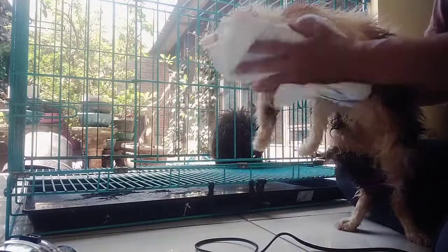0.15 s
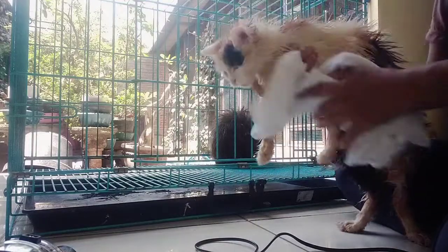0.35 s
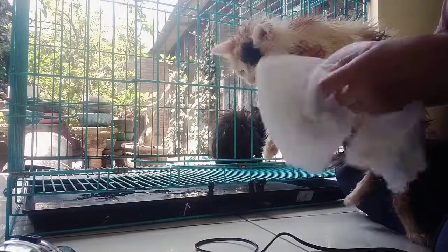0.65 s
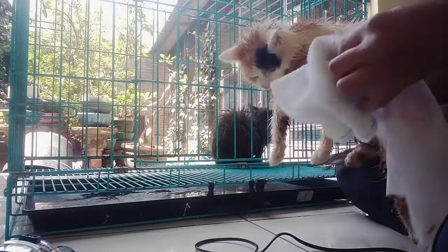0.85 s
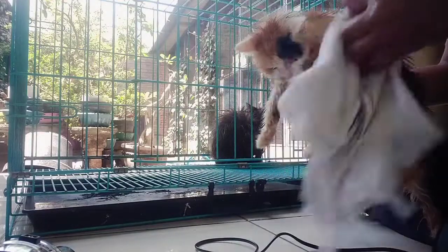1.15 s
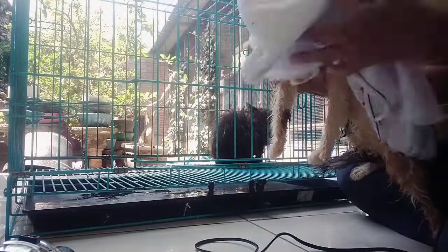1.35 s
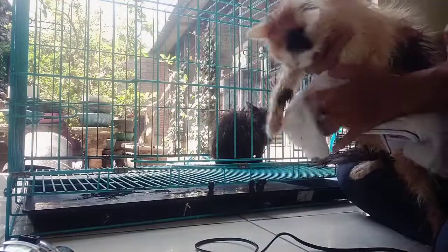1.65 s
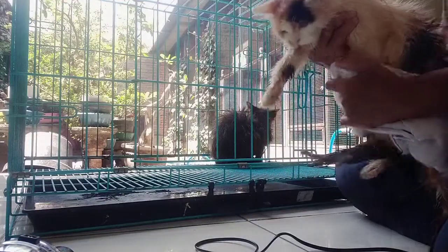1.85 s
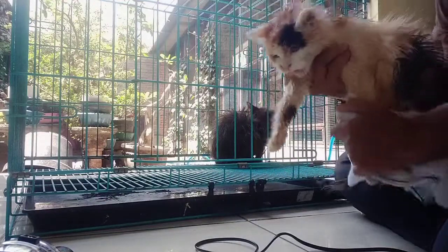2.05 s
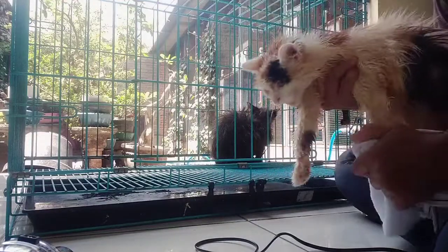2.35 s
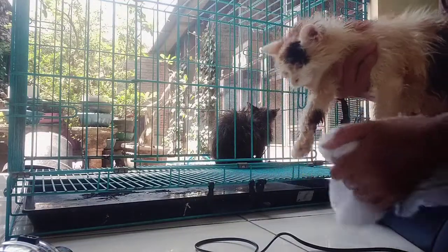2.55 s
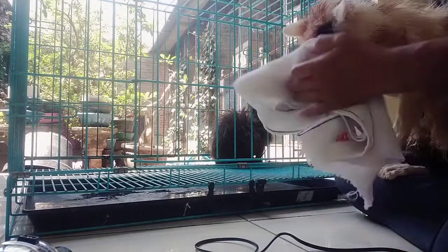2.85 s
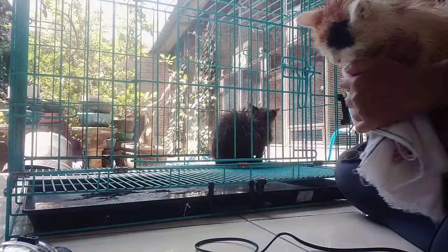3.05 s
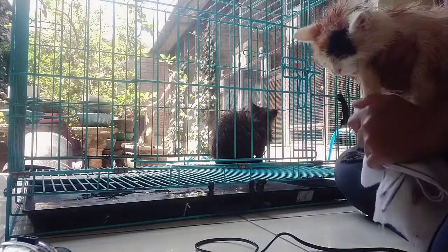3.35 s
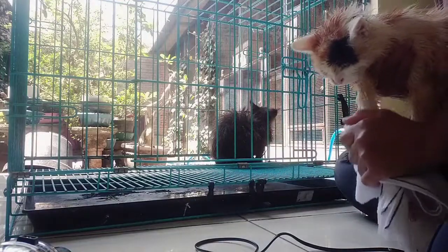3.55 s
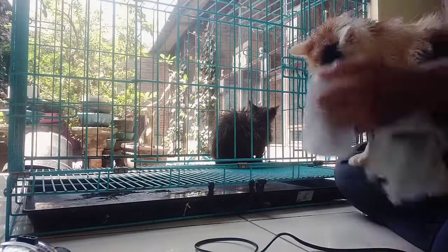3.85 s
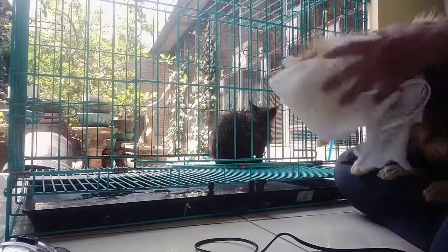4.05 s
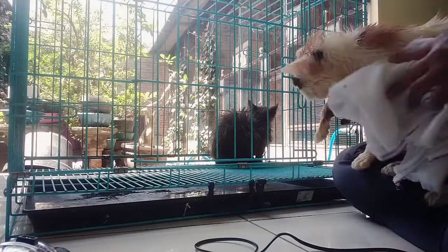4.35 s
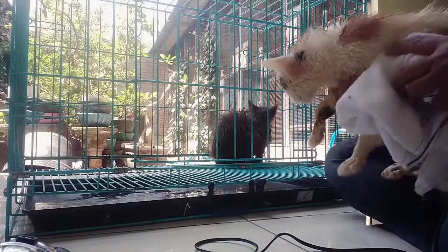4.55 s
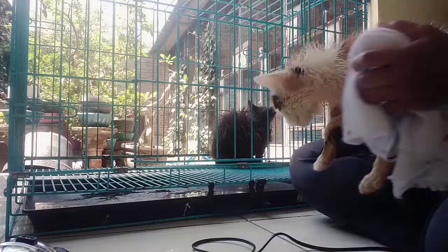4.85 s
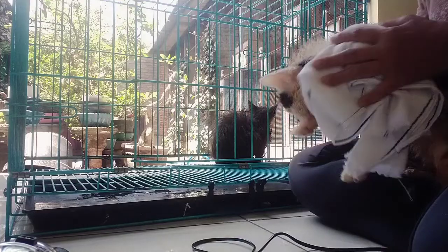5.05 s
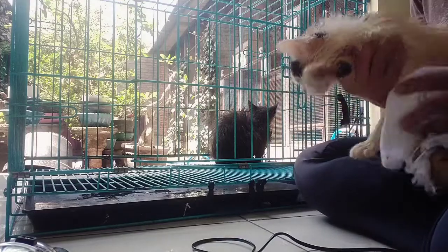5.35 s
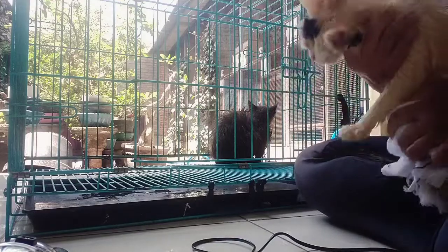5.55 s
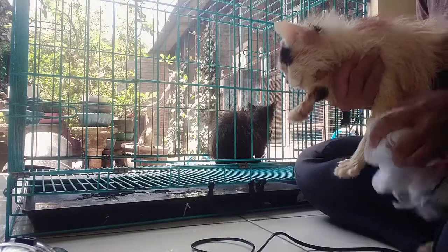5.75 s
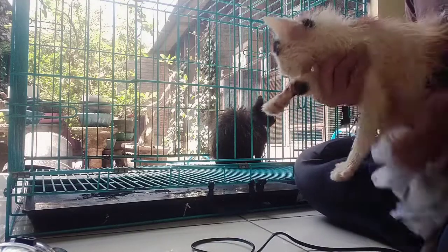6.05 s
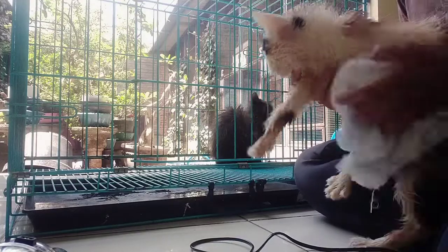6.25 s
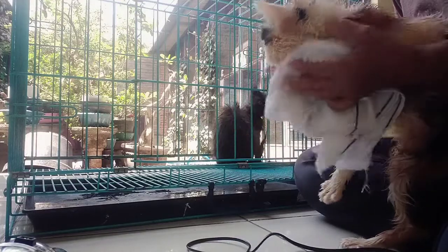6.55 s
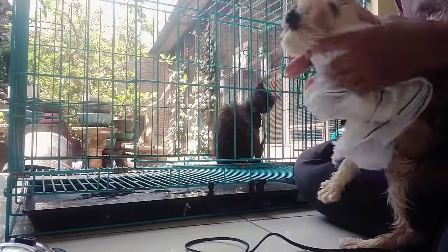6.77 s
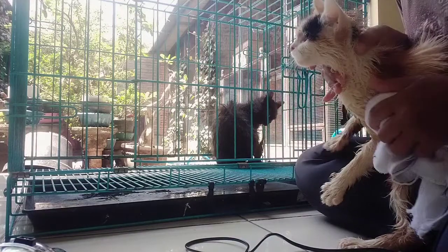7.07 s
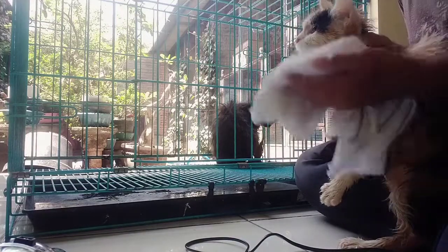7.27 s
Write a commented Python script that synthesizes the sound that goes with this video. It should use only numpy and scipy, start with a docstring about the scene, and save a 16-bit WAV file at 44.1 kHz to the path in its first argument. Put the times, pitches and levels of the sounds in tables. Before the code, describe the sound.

A hair dryer blows steadily close by on a tiled porch while several garden birds whistle, chip and swoop over the airy roar.

```python
"""A hair dryer blows steadily on a tiled porch, close to a small microphone: shaped noise that flickers.
Four garden birds call over it, built from gliding tones with overtones: one whistles, one swoops,
one repeats a two-note chip and one peeps thinly. The yard walls add echoes and a short tail to them.
Faint motor and mains tones and a low rumble lie underneath."""
import sys
import numpy as np
from scipy import signal
from scipy.fft import rfft, irfft, next_fast_len
from scipy.io import wavfile

SR = 44100
rng = np.random.default_rng(int(sys.argv[2]) if len(sys.argv) > 2 else 0)


def store_wav(level_fs):
    """Save 16-bit WAV to argv[1]."""
    pcm = np.round(np.clip(np.atleast_2d(level_fs), -1, 1) * 32767)
    wavfile.write(sys.argv[1], SR, pcm.T.astype(np.int16))


N = 326781   # length in samples


def amp(db):
    """Turns a level in dB into a gain."""
    return 10 ** (np.asarray(db) / 20)


def rms_one(x):
    """Scales a sound to an rms of 1."""
    return x / np.sqrt(np.mean(x ** 2) + 1e-20)


def drift(rate_hz):
    """Random wandering of rms 1: noise through two equal one-pole low-passes, made every 40 samples."""
    pole = np.exp(-2 * np.pi * rate_hz * 40 / SR)
    noise = rng.standard_normal(N // 40 + 2002)
    slow = signal.lfilter([1], [1, -2 * pole, pole ** 2], noise)[2000:]   # skip the filter's start
    return np.interp(np.arange(N) / 40, np.arange(len(slow)), rms_one(slow))


# Broad colour of the air jet; only the balance counts: pitch_hz, level_db (per Hz)
JET = [(28, -28), (120, -50), (315, -66), (480, -16.5), (1350, -15), (2200, -25.5), (2900, -19),
       (3300, -17.5), (4100, -22), (6450, -26), (9300, -29.5), (11300, -30), (14000, -27.5), (15800, -19.5)]
# Resonances of barrel, nozzle and grille, on the same scale: centre_hz, width_hz, level_db (per Hz)
BARREL = [(683, 178, -2.5), (980, 452, -2), (1436, 27, -5.5), (1769, 322, 2), (2426, 620, -12.5),
          (2670, 245, -12.5), (4750, 880, -21.5), (7480, 750, -25.5), (8240, 960, -17), (10400, 690, -26.5),
          (12000, 470, -26.5), (15900, 450, -30)]
FLOW_DB = -25.5   # rms level of the whole air flow


def dryer(shared_db=0.6, own_db=0.88):
    """Turbulent air: noise coloured by jet and barrel; octave bands flicker together and on their own."""
    size = next_fast_len(N)
    hz = np.arange(size // 2 + 1) * SR / size + 1   # the 1 avoids log(0)
    jet_hz, jet_db = np.transpose(JET)
    power = amp(np.interp(np.log(hz), np.log(jet_hz), jet_db)) ** 2
    for centre_hz, width_hz, level_db in BARREL:
        offset = (hz - centre_hz) / (.5 * width_hz)
        power = power + amp(level_db) ** 2 / (1 + offset ** 2) ** 2
    spectrum = rfft(rng.standard_normal(size)) * np.sqrt(power)
    octave = np.clip(np.log2(hz / 250), 0, 6)
    shared_flicker = drift(4.0)
    air = 0
    for k in range(7):
        share = np.clip(1 - np.abs(octave - k), 0, 1)   # neighbouring bands overlap
        band = irfft(spectrum * share, size)[:N]
        air = air + band * amp(shared_db * shared_flicker + own_db * drift(10.6))
    return amp(FLOW_DB) * rms_one(air)


def sing(notes, overtones, waver, throb_db, tremble_hz=68.0):
    """Gliding tones with soft ends; pitch trembles by the share waver, level by throb_db (both rms)."""
    out = np.zeros(N)
    tremble = drift(tremble_hz)
    throb = amp(throb_db * drift(23.4))
    for note, share in zip(notes, np.broadcast_to(waver, len(notes))):
        time_s, pitch_hz, level_db = np.transpose(note)
        at = np.arange(int(time_s[0] * SR), int(time_s[-1] * SR))
        pitch = np.interp(at / SR, time_s, pitch_hz) * (1 + share * tremble[at])
        phase = 2 * np.pi * np.cumsum(pitch) / SR
        tone = sum(amp(db) * np.sin(k * phase) for k, db in overtones)
        level = np.sqrt(2) * amp(np.interp(at / SR, time_s, level_db))
        out[at] += level * signal.windows.tukey(len(at), .15) * tone
    return out * throb


# All bird levels below are base levels, before overtones, throb, yard and mix.
# Short pips of the whistler: peak_s, pitch_hz, level_db, glide_hz_per_s
PIPS = [(.35, 3020, -23.5, 400), (.52, 2170, -21.5, -300), (.655, 2420, -21, -2500),
        (.96, 2784, -15, -1500), (.99, 2360, -19, 900), (1.15, 2293, -17.5, -400), (1.508, 1823, -12, 1500),
        (1.63, 2122, -10, -4500), (1.735, 1480, -17, -2600), (1.765, 2568, -11, -400),
        (1.826, 2530, -15, -2000), (2.34, 2800, -28, 600), (6.299, 3240, -29, -2500),
        (6.345, 3100, -24.5, -2500), (6.4, 2830, -27, -1500)]
PIP_ATTACK_S, PIP_RELEASE_S = .022, .017
PIP_START_DB, PIP_END_DB = -26, -26   # relative to the peak


def pips():
    """A quick rise and fall in level on a straight glide."""
    notes = []
    for peak_s, hz, db, glide in PIPS:
        notes.append([(peak_s - PIP_ATTACK_S, hz - glide * PIP_ATTACK_S, db + PIP_START_DB),
                      (peak_s, hz, db),
                      (peak_s + PIP_RELEASE_S, hz + glide * PIP_RELEASE_S, db + PIP_END_DB)])
    return notes


# Lead notes of the whistler's two-note phrase: start_s, length_s, held_pitch_hz, level_db, sag_hz
LEADS = [(2.993, 0.12, 2037, -10, 45), (4.002, 0.14, 2041, -12, 8.8), (5.336, .13, 2036, -11.5, 135)]
SCOOP_S, SETTLE_S = .031, .065   # times after the start
SCOOP_HZ, OVERSHOOT_HZ = 354, 73.4   # how far below it starts, how far above it swings
SCOOP_DB, TURN_DB, LEAD_END_DB = -4.5, -4.5, -17   # relative to the held level


def leads():
    """Scoops up past the pitch, settles on it, holds while sagging, then fades."""
    notes = []
    for s, length, hz, db, sag_hz in LEADS:
        notes.append([(s, hz - SCOOP_HZ, db + SCOOP_DB),
                      (s + SCOOP_S, hz + OVERSHOOT_HZ, db + TURN_DB),
                      (s + SETTLE_S, hz, db),
                      (s + 0.84 * length, hz - sag_hz, db),
                      (s + length, hz - sag_hz, db + LEAD_END_DB)])
    return notes


# Burred notes of the whistler:
# start_s, length_s, start_hz, turn_hz, crest_hz, end_hz, level_db, burr (share of pitch)
ANSWERS = [(1.921, 0.18, 2010, 2127, 2257, 2207, -17, 0.034),
           (2.151, 0.24, 1895, 1968, 2067, 2300, -16, 0.05),
           (3.178, 0.23, 2004, 1808, 1902, 2380, -13, .016),
           (4.194, .23, 2032, 1828, 2070, 2450, -14, 0.0505),
           (5.548, .2, 2008, 1696, 1962, 2384, -16, 0.04)]
TURN_SHARE, CREST_SHARE = .22, .65   # shares of the note's length
ANSWER_START_DB, ANSWER_END_DB = -1.5, -21.5   # relative to the middle


def answers():
    """Slides to a turning pitch, climbs to a crest, then fades while moving to its end pitch."""
    notes = []
    for s, length, start_hz, turn_hz, crest_hz, end_hz, db, burr in ANSWERS:
        notes.append([(s, start_hz, db + ANSWER_START_DB),
                      (s + TURN_SHARE * length, turn_hz, db),
                      (s + CREST_SHARE * length, crest_hz, db),
                      (s + length, end_hz, db + ANSWER_END_DB)])
    return notes


# Overtones of the whistler: multiple of the pitch, level_db
WHISTLE_OVERTONES = [(1, 0.5), (4, -31), (5, -32), (6, -38)]


def whistler():
    """Nearly pure whistles; the burred answers tremble faster than the pips and leads."""
    clear = sing(pips() + leads(), WHISTLE_OVERTONES, waver=.016, throb_db=2.5)
    burr = np.array(ANSWERS)[:, -1]
    return clear + sing(answers(), WHISTLE_OVERTONES, waver=burr, throb_db=3.0, tremble_hz=130)


# Swooping bird:
# start_s, length_s, start_hz, goal_hz, glide_s, peak_s (after the start), level_db, rasp (share of pitch)
SWOOPS = [(.815, .035, 7000, 6870, .01, 0.011, -29, 0.032),
          (1.011, .04, 5500, 5200, .015, .015, -28, 0.027),
          (3.981, 0.013, 3620, 6530, 0.011, 0.012, -15, 0.067),
          (3.995, 0.051, 6180, 5710, 0.0066, 0.014, -16, .045),
          (3.998, 0.035, 5200, 5050, 0.011, .01, -20, 0.037),
          (4.014, .055, 5000, 4210, 0.0114, 0.017, -23, 0.055),
          (6.467, 0.033, 4300, 1990, 0.023, .016, -24, 0.073),
          (6.508, .034, 6100, 5040, .03, 0.016, -17.5, .06),
          (6.525, .05, 6100, 4660, 0.0062, .016, -18.5, .012),
          (6.646, .118, 4460, 2170, .064, 0.051, -14.5, 0.0062)]
SWOOP_START_DB, SWOOP_END_DB = -11.5, -20.5   # relative to the peak


def swooper():
    """Pure tones whose pitch nears a goal, fast at first; the level rises to one peak and falls."""
    notes = []
    for s, length, start_hz, goal_hz, glide_s, peak_s, db, rasp in SWOOPS:
        t = np.linspace(0, length, 40)
        pitch_hz = goal_hz + (start_hz - goal_hz) * np.exp(-t / glide_s)
        level_db = db + np.interp(t, [0, peak_s, length], [SWOOP_START_DB, 0, SWOOP_END_DB])
        notes.append(np.c_[s + t, pitch_hz, level_db])
    return sing(notes, [(1, 0.)], waver=np.array(SWOOPS)[:, -1], throb_db=3.0, tremble_hz=130)


# Chip calls: start_s, high_hz, high_level_db, low_hz, low_level_db, scoop_hz
CHIPS = [(1.508, 5140, -29, 4110, -30, 156), (2.603, 5390, -29.5, 4080, -24.5, 546),
         (3.617, 5270, -28.5, 4140, -28.5, 442), (4.877, 5350, -27, 4070, -26.5, 560),
         (6.012, 5550, -27, 4080, -26.5, 798)]
# Shape of the high note: time_s from the call's start, share of scoop below pitch, level_db on top
CHIP_HIGH = [(0, 0.99, -3), (.012, 0.75, -2.5), (.026, .1, 1.5), (.04, 0.039, -7)]
# Shape of the low note, same columns; a negative share lies above the pitch
CHIP_LOW = [(0.036, -0.34, -34), (.046, 0.032, 6.5), (.058, .05, -13.5), (.068, -0.39, -10)]
# Overtones of the chip: multiple of the pitch, level_db
CHIP_OVERTONES = [(1, 1), (2, -11.5)]


def chips():
    """A scooped high note, then a low one; each call has its own pitches, levels and scoop."""
    notes = []
    for s, high_hz, high_db, low_hz, low_db, scoop_hz in CHIPS:
        scale = [1, -scoop_hz, 1]
        notes.append(np.array(CHIP_HIGH) * scale + [s, high_hz, high_db])
        notes.append(np.array(CHIP_LOW) * scale + [s, low_hz, low_db])
    return sing(notes, CHIP_OVERTONES, waver=.011, throb_db=2.5)


# Arched notes of the thin near bird: start_s, length_s, top_s (after the start), top_hz, bend_hz_per_s2, level_db
PEEPS = [(0.83, .17, 0.069, 4190, 9000, -35.5), (1.093, 0.16, 0.046, 4250, 29500, -34),
         (4.16, 0.11, 0.018, 3856, 40000, -33), (4.374, .16, 0.057, 4010, 62400, -33)]
# Overtones of the peep: multiple of the pitch, level_db
PEEP_OVERTONES = [(1, 3), (2, -4.5), (3, -18), (4, -1.5)]
PEEP_EDGE_DB = -3   # at both ends, relative to the middle


def peeper():
    """The pitch arches over its top; the ends are a little softer."""
    notes = []
    for s, length, top_s, top_hz, bend, db in PEEPS:
        t = np.linspace(0, length, 40)
        pitch_hz = top_hz - bend * (t - top_s) ** 2
        level_db = db + PEEP_EDGE_DB * (2 * t / length - 1) ** 2
        notes.append(np.c_[s + t, pitch_hz, level_db])
    return sing(notes, PEEP_OVERTONES, waver=.026, throb_db=3.0, tremble_hz=130)


# Echoes from the nearest walls: delay_s, level_db (relative to the direct sound)
ECHOES = [(.035, -11), (.075, -21), (.135, -12)]
YARD_T60_S, YARD_ONSET_S = .42, .004   # time of a 60 dB fall, build-up time
FAR_WALL_S, PAST_WALL_DB = .125, -4.0   # from here the tail loses this much extra


def yard(x, direct_db):
    """Direct sound, wall echoes and dense scatter that weakens once the far wall has answered."""
    t = np.arange(int(.9 * SR)) / SR
    past_wall = np.clip((t - FAR_WALL_S) / 0.048, 0, 1)
    fall_db = -60 * t / YARD_T60_S + PAST_WALL_DB * past_wall
    tail = rng.standard_normal(len(t)) * amp(fall_db) * (1 - np.exp(-t / YARD_ONSET_S))
    response = tail / np.sqrt(np.sum(tail ** 2))   # tail energy 1, so direct_db is relative to it
    response[0] = amp(direct_db)
    for delay_s, db in ECHOES:
        response[int(delay_s * SR)] += amp(direct_db + db)
    return signal.fftconvolve(x, response)[:N]


# Steady motor and mains tones: pitch_hz, level_db (rms, before the waver)
HUM = [(49, -62.5), (150, -68), (360, -67), (399, -57.5), (480, -60.5)]


def hum():
    """Faint sine tones of fixed pitch that waver in level."""
    t = np.arange(N) / SR
    out = np.zeros(N)
    for hz, db in HUM:
        out += np.sqrt(2) * amp(db + 0.87 * drift(1.0)) * np.sin(2 * np.pi * hz * t)
    return out


# Swells added to the resting rumble: peak_s, level_db
SWELLS = [(.93, -52), (1.33, -51), (4.68, -57)]
RUMBLE_DB, SWELL_S = -61.5, .11   # level at rest; time from a swell's peak to 37 % of it


def rumble():
    """Noise in a low band, 35 to 65 Hz, swelling now and then."""
    t = np.arange(N) / SR
    band = signal.butter(2, [35, 65], "band", fs=SR, output="sos")
    level = amp(RUMBLE_DB)
    for peak_s, db in SWELLS:
        level = level + amp(db) * np.exp(-((t - peak_s) / SWELL_S) ** 2)
    return level * rms_one(signal.sosfilt(band, rng.standard_normal(N)))


def scene():
    """Birds in the yard over the dryer; each bird has its own direct level and its own tail."""
    birds = amp(-5.0) * yard(whistler(), direct_db=-1.5)
    birds += amp(-2.0) * yard(swooper(), direct_db=-7.0)
    birds += amp(-2.0) * yard(chips(), direct_db=-6.5)
    birds += amp(-6.0) * yard(peeper(), direct_db=1.0)
    return (dryer() + birds + hum() + rumble())[None]


CUTOFF_HZ = 15750


def record(dry):
    """High peaks are softly rounded, then the treble above the cutoff is cut steeply."""
    rounded = .8 * np.tanh(dry / .8)
    low_pass = signal.ellip(14, .3, 75, CUTOFF_HZ, fs=SR, output="sos")
    return signal.sosfilt(low_pass, rounded)


dry = scene()
out = record(dry)
store_wav(out)
```